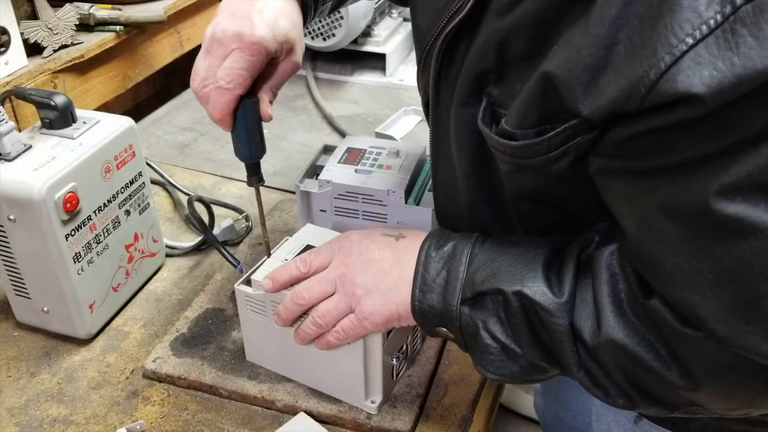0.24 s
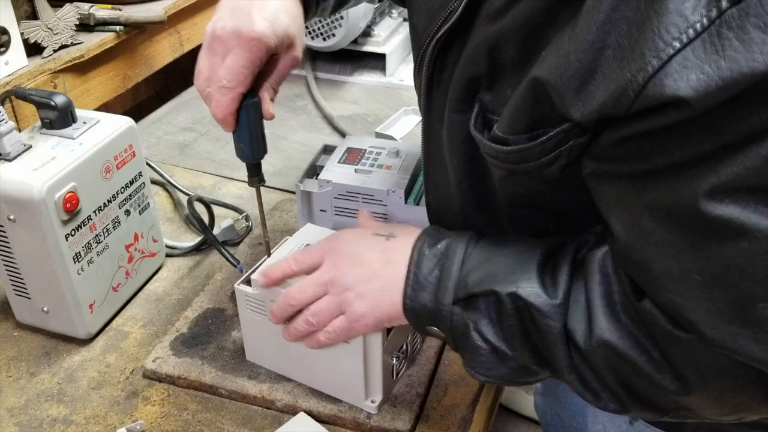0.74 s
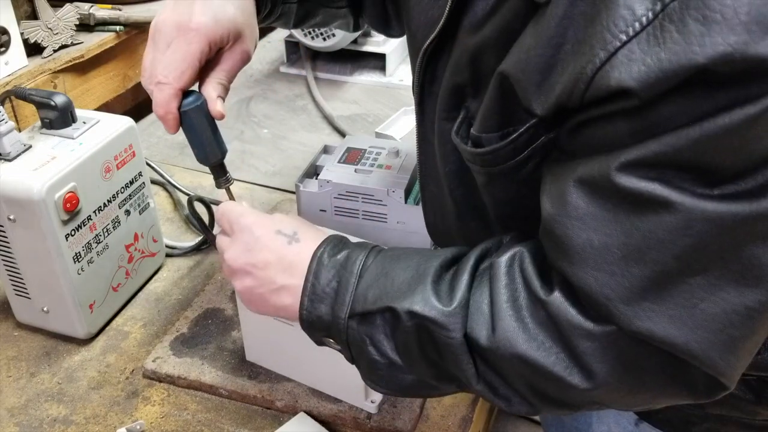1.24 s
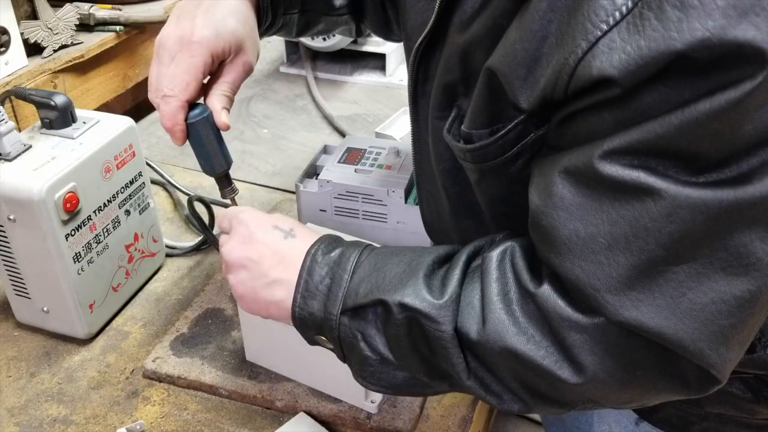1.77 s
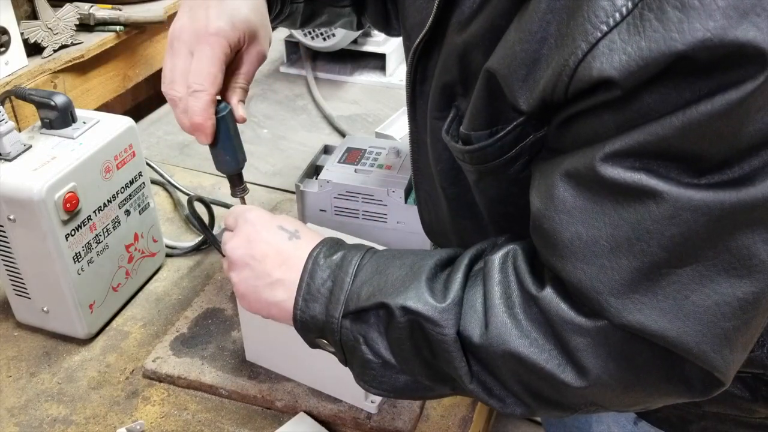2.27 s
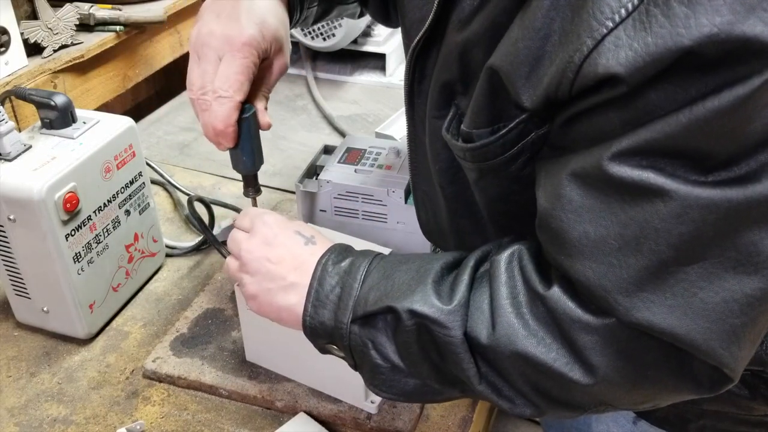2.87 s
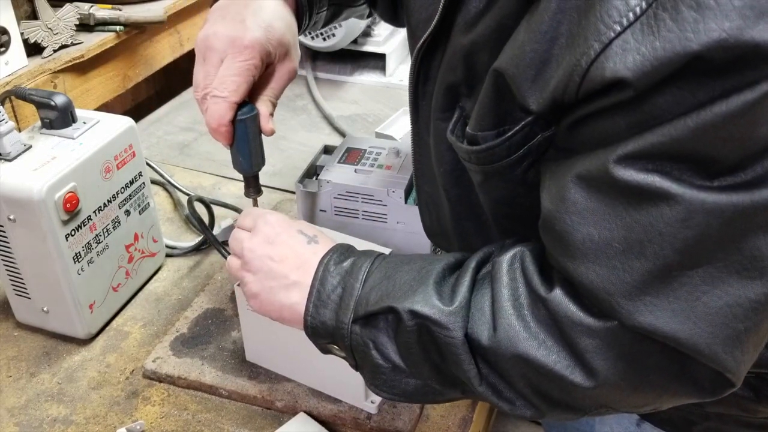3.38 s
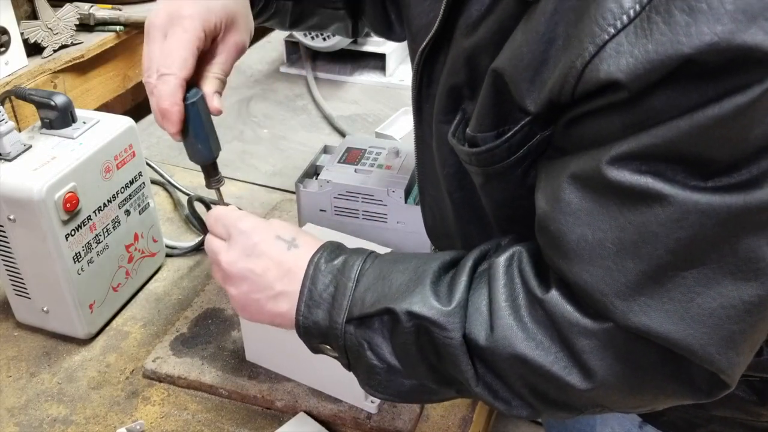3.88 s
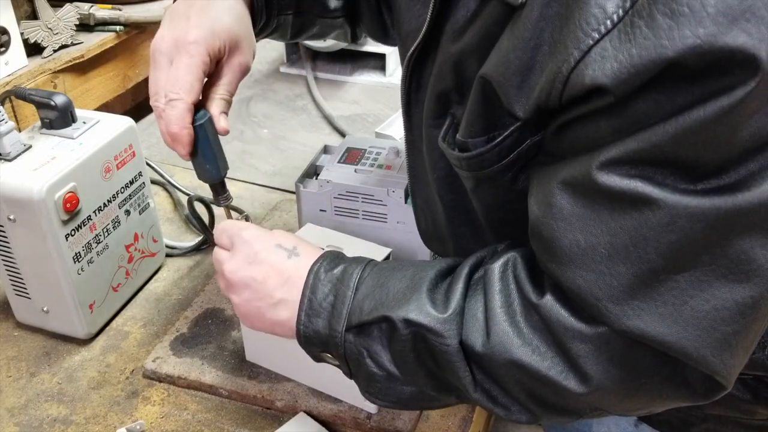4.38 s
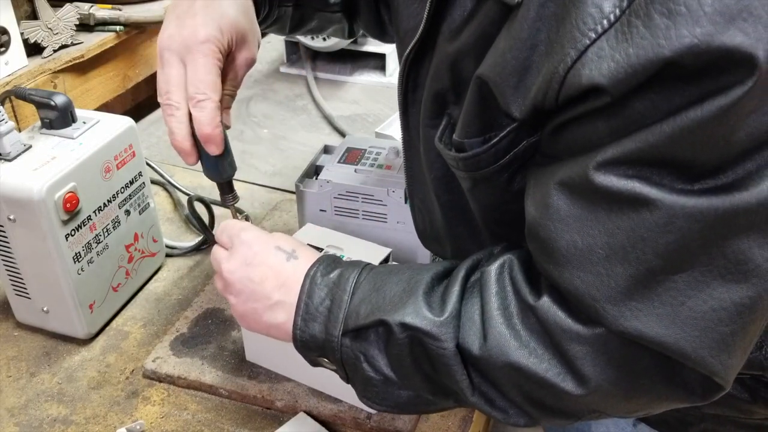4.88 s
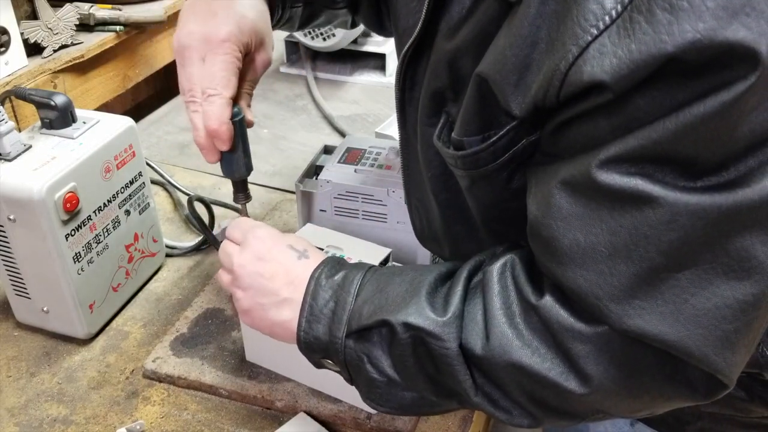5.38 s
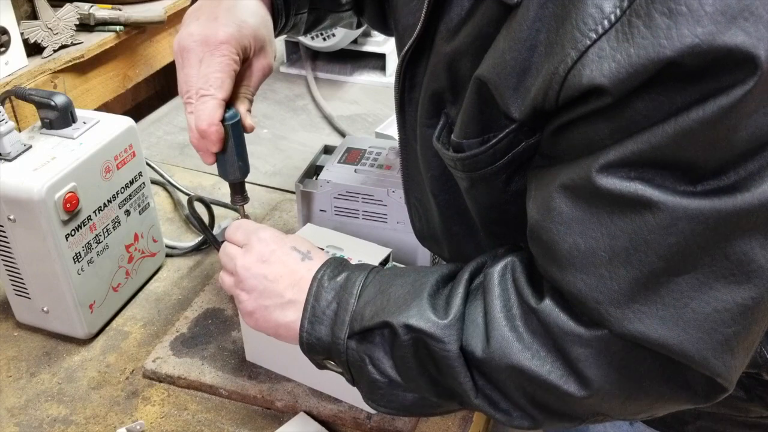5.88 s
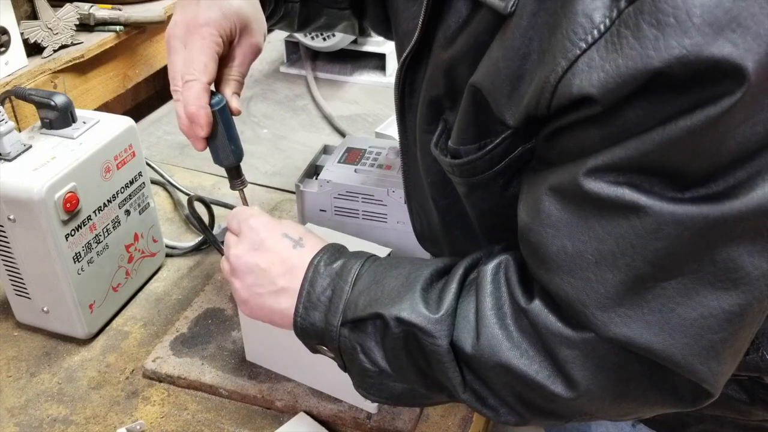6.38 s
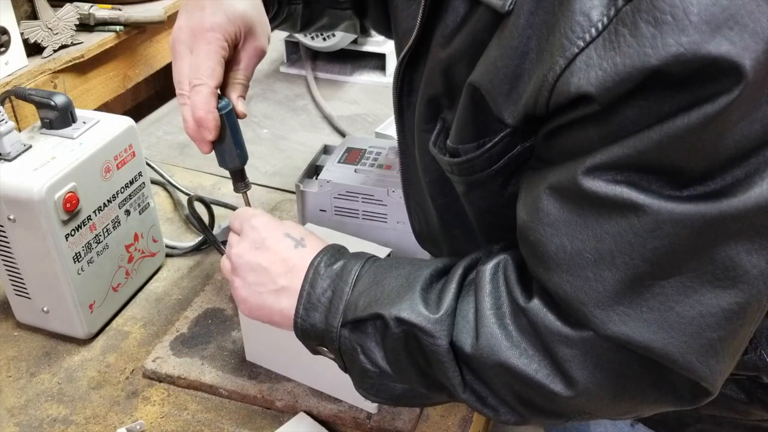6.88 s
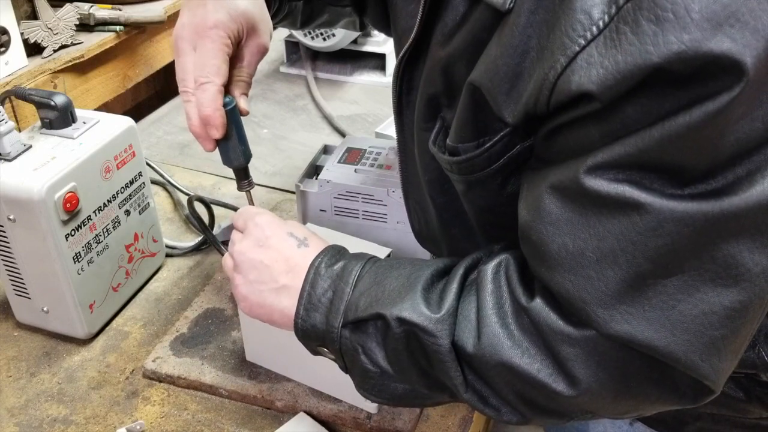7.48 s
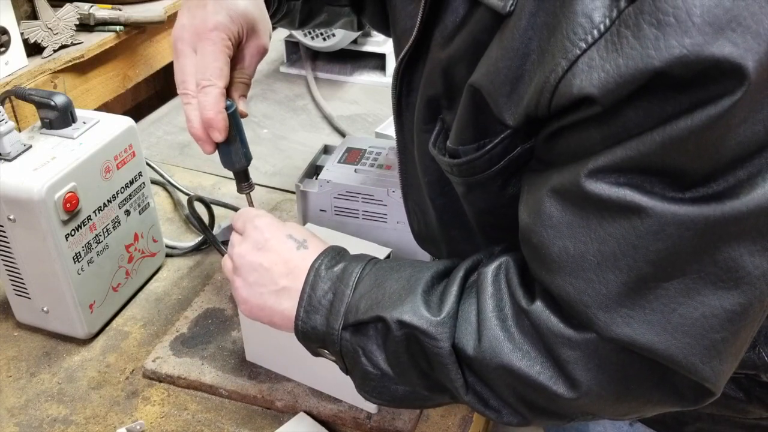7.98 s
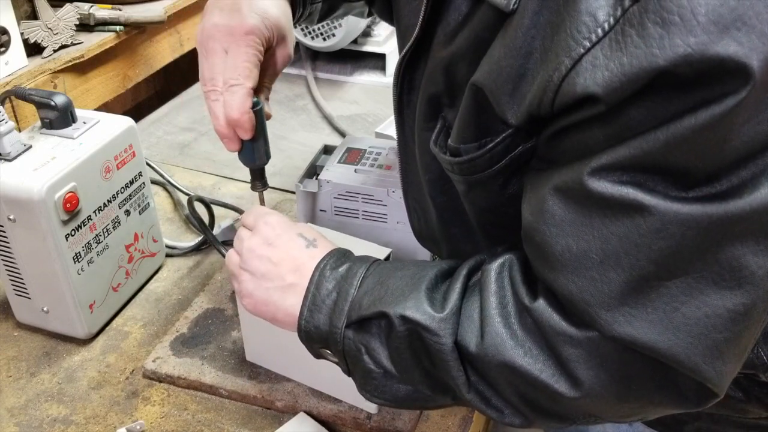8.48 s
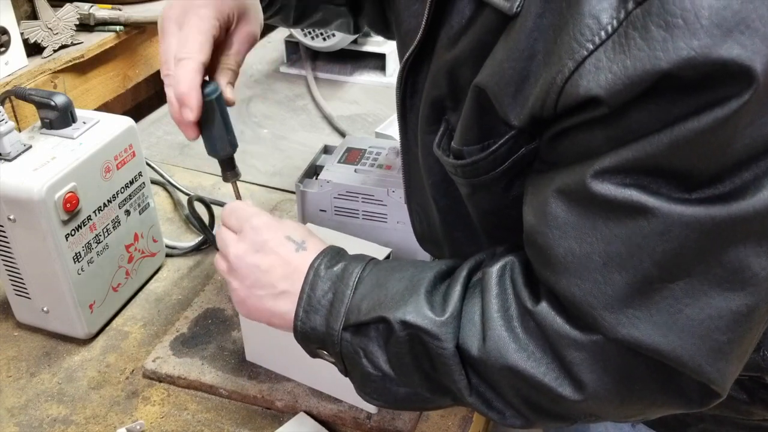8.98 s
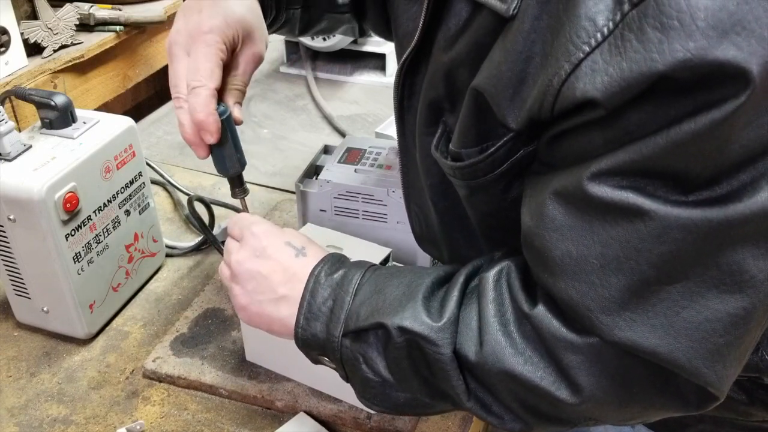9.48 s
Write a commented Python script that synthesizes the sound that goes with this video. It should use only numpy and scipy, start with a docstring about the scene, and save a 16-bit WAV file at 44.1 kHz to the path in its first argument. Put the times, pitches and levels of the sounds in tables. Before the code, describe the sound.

A muffled engine outside drones low and unsteadily throughout, over faint electrical hum and hiss. Barely audible steel ticks start close by; at 0.7 s a leather sleeve swishes softly with a light scrape. From 1.6 to 2.3 s a screwdriver lands in a quick cluster of hollow plastic knocks, hardest at 1.8 and 2.2, as the engine climbs in pitch, then sinks to a slower idle by 3.1. Clicks come around 3.5-3.6 s; the engine swells again near 3.85. A solid boxy knock hits at 4.35, small metal clicks at 4.7. Around 5.95 s comes the strongest sharp double tap with a gritty scrape, then lighter knocks until 7. The engine weakens from about 5.7 to 7. At 7.15 a wire end twangs thinly among clicks. Near silence follows, then a crisp double tap at 8.8, soft touches at 9.2, and final taps and scrapes at 9.5-9.7. Short room echo.

```python
"""A small screwdriver taps and scrapes on the terminal screws of a plastic control box held on a workbench.
Every contact rings modes and dense noise of the hollow case, the terminal block and the steel tip.
A wire end twangs as decaying tones and buzz; the workshop answers with early reflections and a short tail.
Shaped noise makes a leather sleeve rustle; outside, an engine of wavering shaft orders and bass noise
speeds up and falls back to idle. Faint hum and hiss lie underneath."""
import sys
import numpy as np
from scipy import signal
from scipy.fft import rfft, irfft, next_fast_len
from scipy.io import wavfile
from scipy.ndimage import uniform_filter1d

SR = 44100
rng = np.random.default_rng(int(sys.argv[2]) if len(sys.argv) > 2 else 0)


def pcm_store(signal):
    """Save signal as 16-bit PCM."""
    levels = np.round(np.clip(np.atleast_2d(signal), -1, 1) * 32767)
    wavfile.write(sys.argv[1], SR, levels.astype(np.int16).T)


N = 429534
TIME = np.arange(N) / SR


def undb(db):
    """Decibels to gain."""
    return 10 ** (np.asarray(db) / 20)


def unit(x):
    """Scale to an energy of one per channel."""
    return x / np.sqrt(np.sum(x ** 2, axis=-1, keepdims=True) + 1e-20)


def curves(table):
    """The columns of a table, joined by straight lines in time."""
    s, *columns = np.transpose(table)
    return [np.interp(TIME, s, column) for column in columns]


def colour(x, points):
    """Filter by a spectrum of (f/Hz, level/dB) points, joined on a logarithmic frequency axis."""
    hz, db = np.transpose(points)
    size = next_fast_len(x.shape[-1])
    f = np.maximum(np.fft.rfftfreq(size, 1 / SR), 1)
    gain = undb(np.interp(np.log(f), np.log(hz), db))
    return irfft(rfft(x, size) * gain, size)[..., :x.shape[-1]]


def noise(points, size, channels=2):
    """Coloured noise of rms one, unrelated between channels."""
    white = rng.standard_normal((channels, size))
    return unit(colour(white, points)) * np.sqrt(size)


def walk(rate):
    """Slow random wander with a spread near one: held random steps (rate per s), smoothed twice."""
    k = int(SR / rate)
    steps = np.repeat(rng.standard_normal(N // k + 1), k)
    return 1.247 * uniform_filter1d(uniform_filter1d(steps, k), k)[:N]


def fade(t, t60):
    """Exponential decay by 60 dB in t60 seconds."""
    return undb(-60 * t / t60)


def pan(left_db):
    """Gains of the two channels, left_db apart."""
    return undb(np.array([[left_db], [-left_db]]) / 2)


def widen(mid, side):
    """Stereo from a shared middle and a side of opposite sign in each channel."""
    return mid + np.array([side, -side])


def add(out, s, x):
    """Mix a sound in at time s."""
    i = max(int(s * SR), 0)
    out[:, i:i + x.shape[-1]] += x[..., :max(N - i, 0)]


# what the walls do to the engine's orders: (f/Hz, level/dB)
WALLS = [(60, -1), (96, -1), (116, -8.5), (170, -3), (230, -9)]
# bass resonances of the workshop lift each order that passes through them: (f/Hz, width/Hz, lift/dB)
BOOMS = [(59.1, 4.7, 5.5), (69.9, 5.1, 7.5), (126.2, 7.2, 7), (169.6, 8, 6.5)]


def bass_gain_db(hz):
    """What walls and room resonances do to a tone of this pitch."""
    wall_hz, wall_db = np.transpose(WALLS)
    lift_db = sum(db / (1 + (2 * (hz - centre) / width) ** 2) for centre, width, db in BOOMS)
    return np.interp(hz, wall_hz, wall_db) + lift_db


# shaft rate, before its waver: (t/s, f/Hz)
SHAFT = [(0, 15), (.8, 15), (1.8, 15.7), (2, 16.6), (2.22, 18), (2.6, 15.8), (3.1, 12.1), (3.9, 11.92)]
# how hard the engine works; it revs, drops to idle, takes up a load and eases off: (t/s, level/dB)
LOAD = [(0, -6.5), (1.3, -8), (1.8, -1.5), (2.05, -7), (2.85, -2), (3.2, -5), (3.72, -8.5), (3.84, -0.5),
        (5.7, -3.5), (7, -12.5), (9.74, -13.5)]
# strongest multiples of the shaft rate: (order)
SHAFT_ORDERS = [5, 8, 11, 13]
# their levels at 0 dB load, before walls, resonances and waver: (level/dB)
ORDERS_DB = [-42, -44, -52, -55.5]
# spectrum of the exhaust noise behind the walls: (f/Hz, level/dB)
RUMBLE_COLOUR = [(20, -26.5), (35, -11.5), (52, 3.5), (70, 1), (95, 3), (125, -6.5), (170, -8), (250, -12),
                 (330, -20.5), (450, -39), (900, -71)]


def engine(rumble_db=-43.5, rumble_per_load=0.39, waver_db=2.0):
    """Wavering shaft orders and the exhaust noise rise with the load; the walls let only the bass through."""
    (shaft_hz,), (load_db,) = curves(SHAFT), curves(LOAD)
    wavering_hz = shaft_hz * (1 + 0.0074 * walk(12))
    turn = 2 * np.pi * np.cumsum(wavering_hz) / SR
    drone = 0
    for order, db in zip(SHAFT_ORDERS, ORDERS_DB):
        level_db = db + load_db + bass_gain_db(order * shaft_hz) + waver_db * walk(11)
        drone = drone + np.sqrt(2) * np.sin(order * turn) * undb(level_db)
    mid, side = noise(RUMBLE_COLOUR, N)
    # the lowest bass is nearly alike in both channels
    side = colour(side, [(60, -20.5), (110, -10.5), (200, -13.0), (400, -5)])
    rumble = undb(rumble_db + rumble_per_load * load_db) * widen(mid, side)
    return (drone + rumble) * pan(0.56)


# mains hum and its faint upper harmonics, before their drift: (f/Hz, level/dB)
HUM = [(120, -59.5), (599, -83), (1441, -85), (1561, -86), (1680, -86.5), (1921, -90.5)]
# spectrum of room air and microphone hiss: (f/Hz, level/dB)
HISS = [(100, 6.5), (450, 3), (800, -2), (1200, -4.5), (1650, -6), (2300, -9), (3500, -14), (7600, -18.5),
        (8300, -26.5), (9600, -20), (10600, -12.5), (12300, -6), (15500, -6)]
HISS_DB = -63


def room_tone():
    """Faint electrical hum, drifting slightly in pitch and level, over an even hiss."""
    hum = 0
    for hz, db in HUM:
        turn = 2 * np.pi * np.cumsum(hz + walk(6)) / SR
        hum = hum + np.sqrt(2) * undb(db + 2 * walk(2.34)) * np.sin(turn)
    mid, side = noise(HISS, N)
    side = colour(side, [(300, -7.5), (700, -1), (1300, 1), (2400, 0.5)])
    hiss = undb(HISS_DB) * widen(mid, side) / np.sqrt(2)
    return hum + hiss * pan(0.83)


# the arm shifts and the leather swishes, before flicker and pan: (t/s, peak level/dB)
SLEEVE_MOVES = [(.06, -70.5), (.7, -60), (2.55, -78), (5, -78.5), (6.7, -70.5), (8.15, -81)]
# spectrum of leather rubbing on skin: (f/Hz, level/dB)
SLEEVE_COLOUR = [(400, -4), (2000, 2.5), (3200, -5), (5300, -3), (6600, 2.5), (7600, 2.5), (8300, -7),
                 (12000, -2), (15500, -27.5)]
SWISH_RISE_T60_S, SWISH_FALL_T60_S, SLEEVE_REST_DB = 0.32, 1.57, -85


def sleeve(flicker_db=4.0):
    """Leather and skin rub in a fine, uneven hush that swells with each move of the arm and dies away."""
    swishes = 0
    for s, db in SLEEVE_MOVES:
        t60 = np.where(TIME < s, SWISH_RISE_T60_S, SWISH_FALL_T60_S)
        swishes = swishes + undb(db) * fade(abs(TIME - s), t60)
    rub = np.hypot(undb(SLEEVE_REST_DB), swishes)
    return noise(SLEEVE_COLOUR, N) * rub * undb(flicker_db * walk(22)) * pan(5.4)


def response(modes, crack, crack_db, crack_t60, spread, size=6000):
    """One part struck once: damped modes, shifted by the contact point, plus a burst of dense modes."""
    t = np.arange(size) / SR
    hz, db, t60 = np.transpose(modes)[:, :, None]
    chance = rng.standard_normal((5, len(modes), 1))
    turn = 2 * np.pi * hz * (1 + .005 * chance[0]) * t + np.pi * chance[1]
    weight = undb(db + 2 * chance[2]) * fade(t, t60)
    # each channel hears the modes at slightly different phases
    ring = np.array([np.sum(weight * np.sin(turn + spread * lag), axis=0) for lag in chance[3:]])
    dense = noise(crack, size, channels=1) + spread * noise(crack, size)
    dense = dense * fade(t, crack_t60)
    # the part takes about a millisecond to start moving
    onset = 1 - np.exp(-t / 0.00076)
    return unit((unit(ring) + undb(crack_db) * unit(dense)) * onset)


def slips(size, rate, scatter_db):
    """Stick-slip: sparse pushes (rate per s) of very unequal strength and random sign."""
    happens = rng.random(size) < rate / SR
    strength = undb(scatter_db * np.minimum(rng.exponential(size=size), 3))
    return happens * rng.choice([-1, 1], size) * strength


# modes of the hollow case on its board: (f/Hz, level/dB, t60/s)
CASE_MODES = [(253, -8.5, 0.094), (345, -7.5, 0.19), (445, -9.5, 0.2), (525.2, 4, 0.067), (548, -7, 0.17),
              (701.5, 0.5, 0.07), (754, -14, 0.082)]
# modes of the terminal block: (f/Hz, level/dB, t60/s)
BLOCK_MODES = [(948, -4, 0.036), (1119, 1.5, 0.039), (1208, 3, 0.019), (1424, -10, 0.056),
               (1813, -5, 0.024), (1968, -8, 0.06), (2210, -12, 0.041), (2536, -6, 0.036)]
# modes of blade and screw: (f/Hz, level/dB, t60/s)
TIP_MODES = [(3540, -7.5, 0.018), (3760, -1.5, 0.011), (4340, -4, 0.011), (5550, -11, 0.021),
             (6620, 8, 0.0099), (7030, 16, 0.0047), (7540, 1, 0.0075)]
# the dense, quickly damped modes of case, block and tip: (f/Hz, level/dB)
CASE_CRACK = [(120, -5.5), (250, 1.5), (550, -6), (800, -10), (1300, -18.5), (3000, -92)]
BLOCK_CRACK = [(500, -17.5), (1050, 2.5), (1550, -6.5), (2450, -5.5), (3000, -26.5), (6000, -61)]
TIP_CRACK = [(2000, -7), (3800, 3), (5300, -2), (6800, 2), (7700, -6), (8400, -9), (9600, -6), (11000, 0),
             (15500, -1)]
# a light touch is brighter: the tip level at which its treble is flat (dB),
# and the tilt (dB per octave, for each dB less)
FLAT_TIP_DB, TIP_BRIGHTENING = -59.5, 0.52


def contact(push, grit, seconds, case_db, block_db, tip_db, thin_db=7):
    """The push rings case and block, the grit under the blade rings the tip; levels hold over the given time."""
    case = response(CASE_MODES, CASE_CRACK, crack_db=0, crack_t60=0.071, spread=0.11)
    block = response(BLOCK_MODES, BLOCK_CRACK, crack_db=-2.0, crack_t60=0.09, spread=0.71)
    tip = response(TIP_MODES, TIP_CRACK, crack_db=3, crack_t60=0.011, spread=1.48)
    # a blow that moves the whole case is a softer push:
    # more of the case's bass, less of the block's upper modes
    softness = 1 / (1 + undb(block_db - case_db) ** 2)
    case = colour(case, [(330, thin_db * (softness ** 4 - 1)), (500, 0)])
    case = unit(signal.fftconvolve(case, push[None], axes=1))
    block = unit(signal.fftconvolve(block, push[None], axes=1))
    tip = unit(signal.fftconvolve(tip, grit[None], axes=1))
    block = colour(block, [(1100, 0), (2200, -6 * softness)])
    tip = colour(tip, [(6500, 0), (13000, TIP_BRIGHTENING * (FLAT_TIP_DB - tip_db))])
    parts = case * undb(case_db) * pan(0.97)
    parts += block * undb(block_db) * pan(1.9)
    parts += tip * undb(tip_db) * pan(4.1)
    return parts * np.sqrt(seconds * SR)


# small shifts of the grip tick faintly: ticks per s, typical tip level/dB, scatter/dB
FIDGETS_PER_S, FIDGET_DB, FIDGET_SCATTER_DB = 3, -71.5, 3


def fidgets(count=60):
    """Faint clicks at chance moments with exponential gaps, as rows (t/s, level/dB)."""
    chance = rng.random((count, 2))
    times = np.cumsum(-np.log(1 - chance[:, 0])) / FIDGETS_PER_S
    levels_db = FIDGET_DB + FIDGET_SCATTER_DB * (2 * chance[:, 1] - 1)
    return [(s, db) for s, db in zip(times, levels_db) if s < N / SR]


# the blade lands or slips; heft is how much more the case sounds than the block:
# (t/s, block level/dB, heft/dB)
KNOCKS = [(1.678, -44.5, 7.5), (1.804, -41.5, -4), (1.816, -37.5, -30), (1.924, -54.5, 7.5),
          (2.132, -47, 4), (2.19, -43.5, 2), (2.2, -36.5, 3), (2.213, -38, 7.5), (2.254, -56, 19.5),
          (3.55, -54, -1), (4.269, -49, 15), (4.356, -34.5, 6.5), (5.643, -60.5, -6), (5.946, -38.5, -7),
          (5.967, -33.5, -20), (6.008, -42, -11), (6.073, -45, -2), (6.303, -47, 8.5), (6.313, -50, 16),
          (6.508, -56.5, -8), (6.658, -47.5, 0), (6.724, -44.5, 0), (6.832, -46, -11), (7, -56, 7),
          (7.284, -47, 10.5), (7.368, -59.5, 15), (7.837, -63, -5), (8.779, -40.5, -16),
          (8.791, -42.5, -22), (9.216, -55, 5), (9.257, -46.5, 9), (9.539, -41, -10), (9.619, -49.5, 3.5),
          (9.711, -58, 12.5)]
# steel touches steel, hardly moving the box: (t/s, tip level/dB)
CLICKS = [(0.035, -68), (0.077, -65), (1.591, -56.5), (3.492, -61), (3.602, -49.5), (4.684, -55),
          (4.715, -58.5), (7.152, -56.5), (7.22, -57.5), (9.71, -53.5)]
KNOCK_TIP_DB = -11  # steel tip against the block
# the little that a click passes on to case and block, against the tip
CLICK_CASE_DB, CLICK_BLOCK_DB = -2.5, -6


def taps(chatter=0.18, chatter_t60=0.046, skid=1.0, blow_s=0.0047, scuff_t60=0.029, lead_s=.015, size=1800):
    """The blade scuffs as it comes down, lands on a screw, then chatters and skids for a moment."""
    out = np.zeros((2, N))
    t = np.arange(size) / SR - lead_s
    blow = signal.unit_impulse(size, int(np.argmin(abs(t))))
    touch = fade(abs(t), np.where(t < 0, scuff_t60, chatter_t60))
    knocks = [(s, db + heft_db, db, db + KNOCK_TIP_DB) for s, db, heft_db in KNOCKS]
    clicks = [(s, db + CLICK_CASE_DB, db + CLICK_BLOCK_DB, db) for s, db in [*CLICKS, *fidgets()]]
    for s, case_db, block_db, tip_db in knocks + clicks:
        push = blow + chatter * slips(size, rate=1500, scatter_db=3.0) * touch
        # steel on steel clicks more cleanly; the blade skids more when the case gives way under it
        skidding = skid / (1 + undb(tip_db - case_db))
        grit = blow + skidding * slips(size, rate=4000, scatter_db=-5.5) * touch
        add(out, s - lead_s, contact(push, grit, blow_s, case_db, block_db, tip_db))
    return out


ROOM_T60_S, ROOM_TREBLE_T60_S = 0.33, 0.28


def workshop(x, early_db=-8, early_t60=0.16, tail_db=0, treble_db=-3, build_s=0.024, size=26000):
    """Quick reflections off bench and boxes, then a diffuse tail whose treble dies first."""
    t = np.arange(size) / SR
    mid, side = rng.standard_normal((2, size))
    # long waves reach both channels nearly alike
    side = colour(side, [(200, -9), (600, -5), (1500, 0.0)])
    diffuse = widen(mid, side) / np.sqrt(2)
    early = unit(diffuse * fade(t, early_t60) * (t > .003))
    low = signal.sosfilt(signal.butter(1, 900, fs=SR, output="sos"), diffuse)
    treble = undb(treble_db) * (diffuse - low)
    tail = low * fade(t, ROOM_T60_S) + treble * fade(t, ROOM_TREBLE_T60_S)
    tail *= (1 - np.exp(-t / build_s)) / np.linalg.norm(fade(t, ROOM_T60_S))
    echo = undb(early_db) * early + undb(tail_db) * tail
    return x + signal.fftconvolve(x, echo, axes=1)[:, :N]


# the blade or the hand slides: (start t/s, end t/s, block level/dB, heft/dB)
SCRAPES = [(0.671, 0.788, -63.5, 1.5), (1.642, 1.698, -63, 3), (1.79, 1.847, -56.5, -4),
           (2.193, 2.226, -54.5, 5), (3.519, 3.578, -58.5, -6.5), (4.313, 4.377, -59.5, -1),
           (5.924, 6.039, -46.5, -21), (6.019, 6.093, -54.5, -4.5), (6.648, 6.75, -61, 3.5),
           (8.76, 8.88, -62.5, -1.5), (9.501, 9.557, -58, -1), (9.569, 9.72, -68.5, 8.5)]
SCRAPE_TIP_DB = -6.5  # steel tip against the block


def scrapes(count=4):
    """Pressure swells and eases while several points of the surfaces catch and slip, each with its own colour."""
    out = np.zeros((2, N))
    for start, end, db, heft_db in SCRAPES:
        size = max(int((end - start) * SR), 200)
        pressure = np.sin(np.linspace(0, np.pi, size))
        for _ in range(count):
            force = slips(size, rate=700, scatter_db=3.5) * pressure
            seconds = size / SR / count
            add(out, start, contact(force, force, seconds, db + heft_db, db, db + SCRAPE_TIP_DB))
    return out


# a wire end twangs; level of the bare tone before rise and decay: (t/s, f/Hz, level/dB, t60/s)
TWANGS = [(7.152, 1977, -54, 0.24), (7.146, 2490, -55, 0.089)]


def twangs(rise_s=0.0073, rough=0.72, size=12000):
    """A wire end slips free and rings as a decaying tone, buzzing against its clamp as narrow noise."""
    out = np.zeros((2, N))
    t = np.arange(size) / SR
    for s, hz, db, t60 in TWANGS:
        buzz = noise([(hz / 2, -40), (hz, 0), (hz * 2, -40)], size)
        ring = np.sqrt(2) * np.sin(2 * np.pi * hz * t) + rough * buzz
        add(out, s, undb(db) * ring * fade(t, t60) * (1 - np.exp(-t / rise_s)))
    return out


def scene():
    """Work at the bench, echoing in the workshop, over the background."""
    background = engine() + room_tone() + sleeve()
    work = taps() + scrapes() + twangs()
    return workshop(work) + background


TOP_HZ = 15850


def record(dry):
    """A steep elliptic low-pass cuts the top of the treble."""
    return signal.sosfilt(signal.ellip(10, .2, 70, TOP_HZ, fs=SR, output="sos"), dry)


dry = scene()
out = record(dry)
pcm_store(out)
```